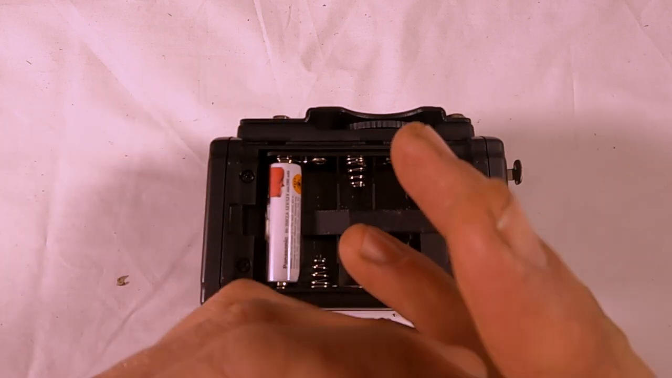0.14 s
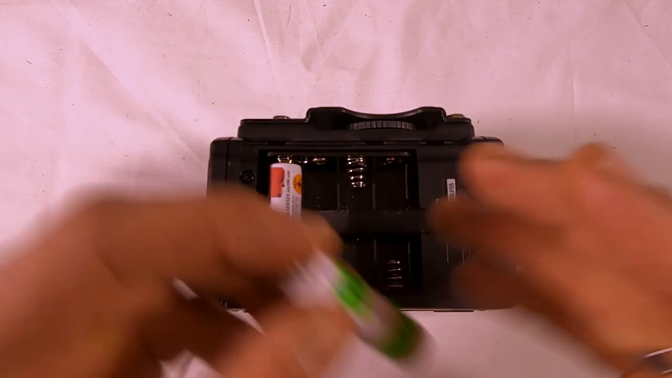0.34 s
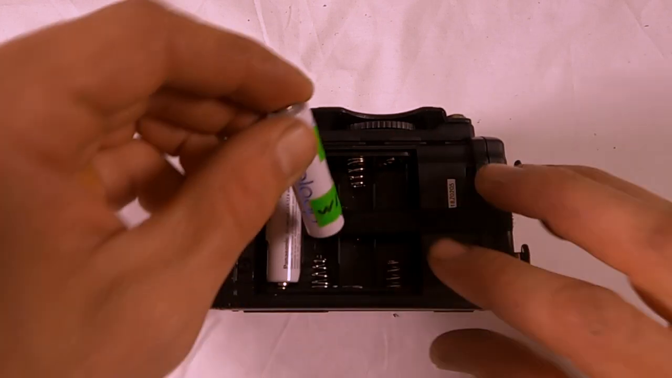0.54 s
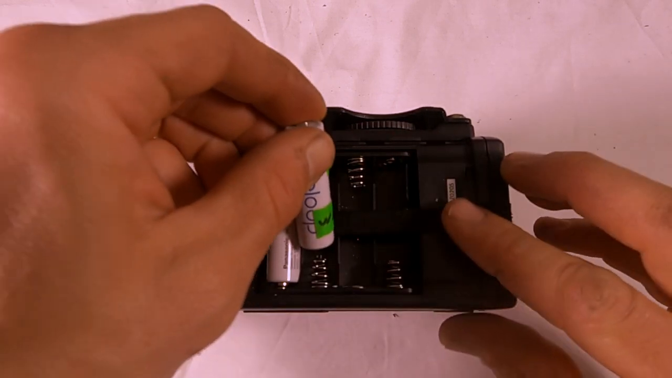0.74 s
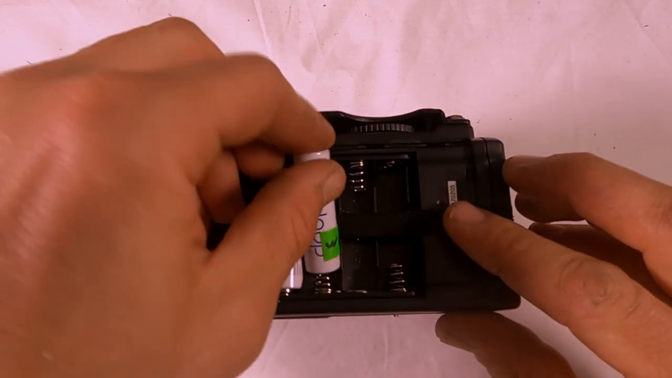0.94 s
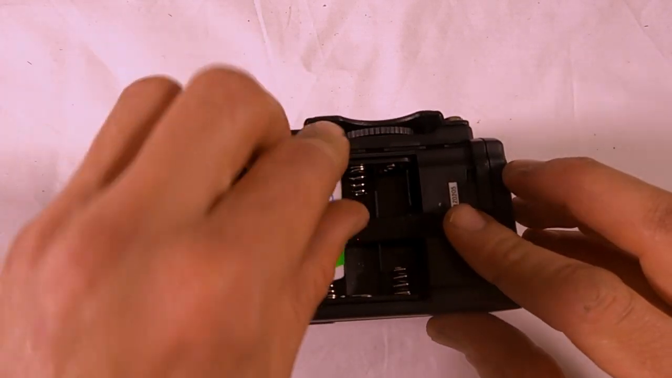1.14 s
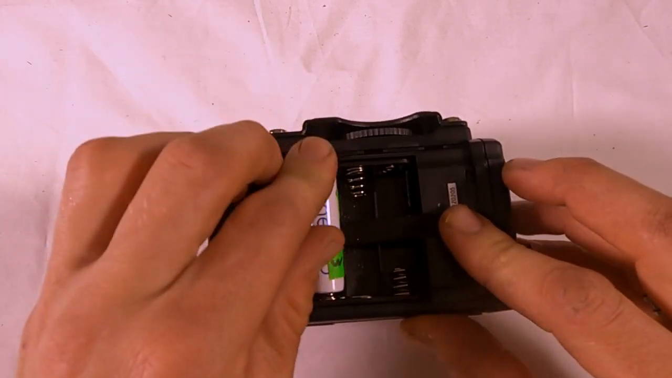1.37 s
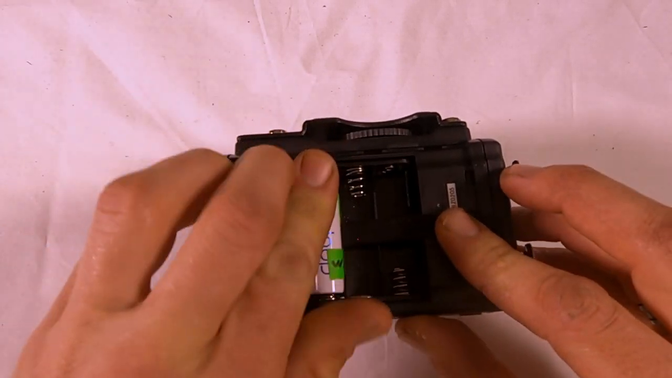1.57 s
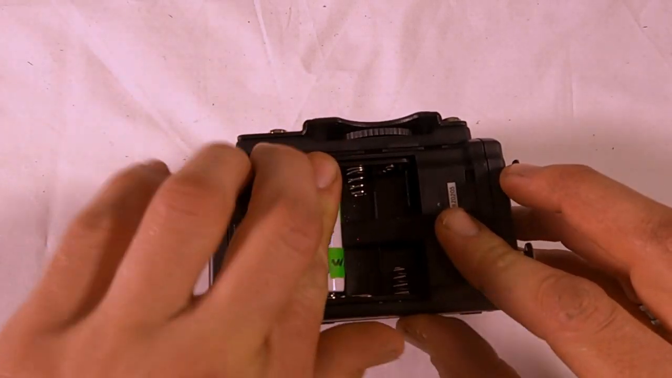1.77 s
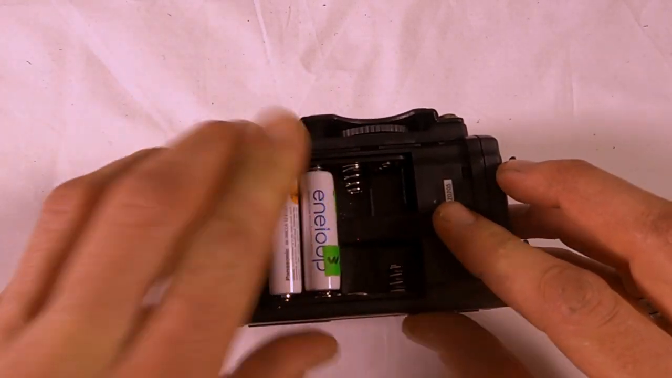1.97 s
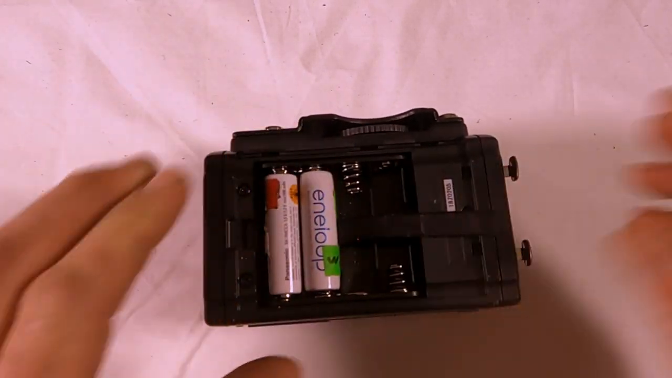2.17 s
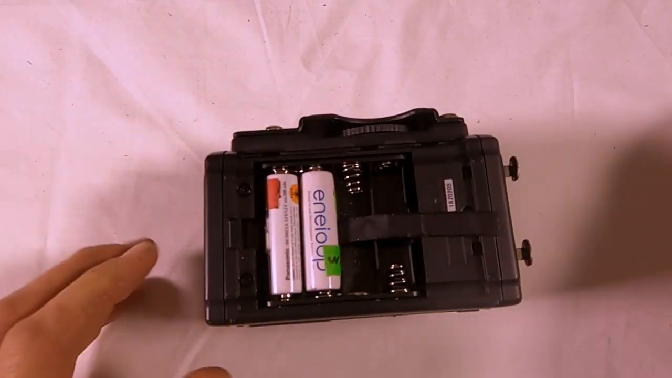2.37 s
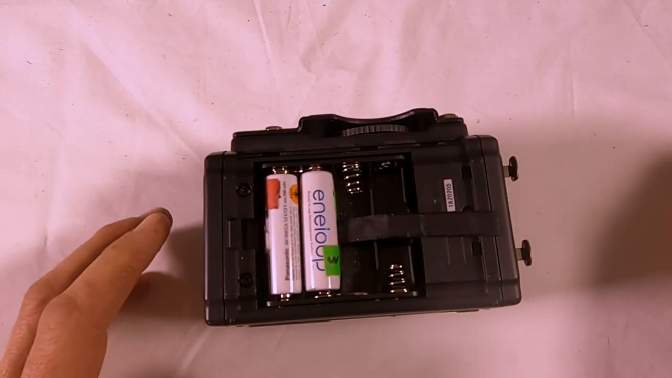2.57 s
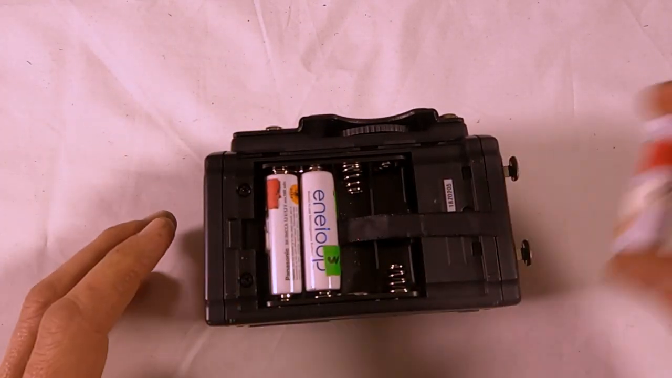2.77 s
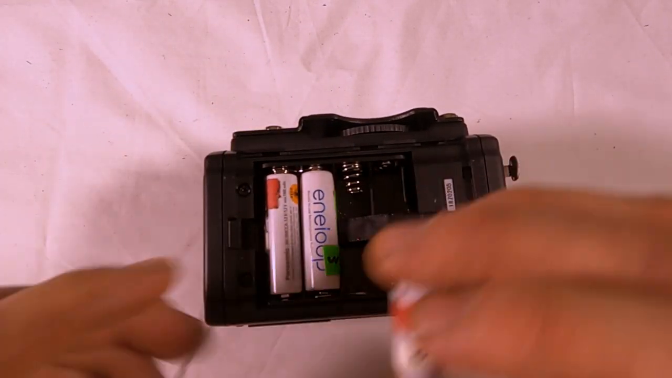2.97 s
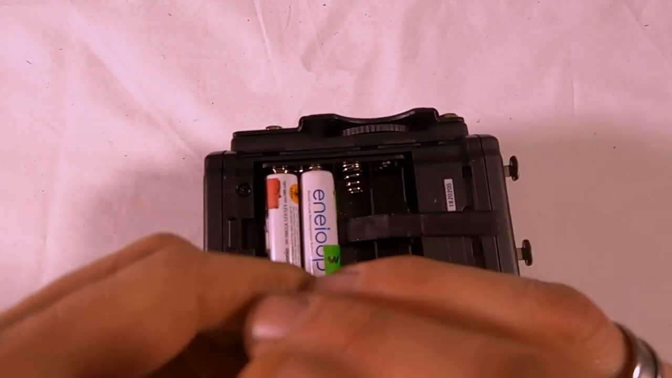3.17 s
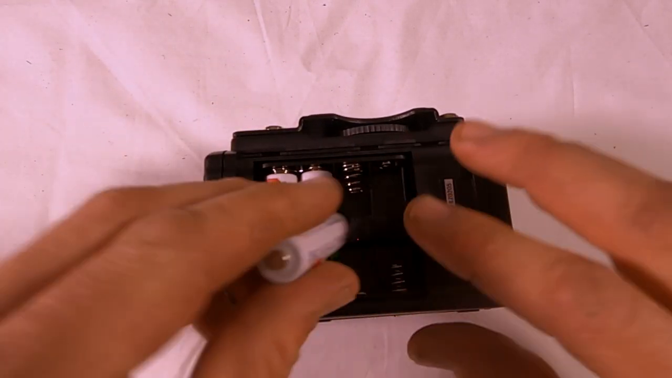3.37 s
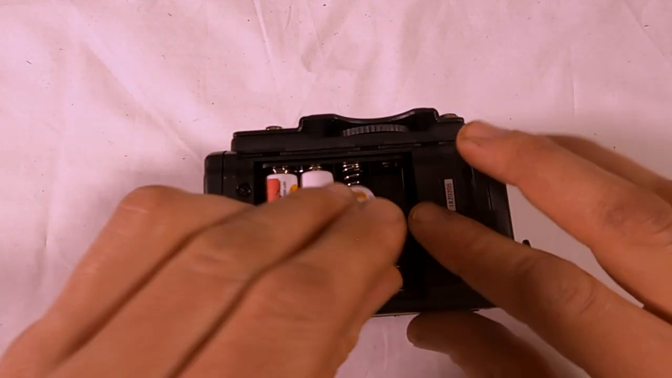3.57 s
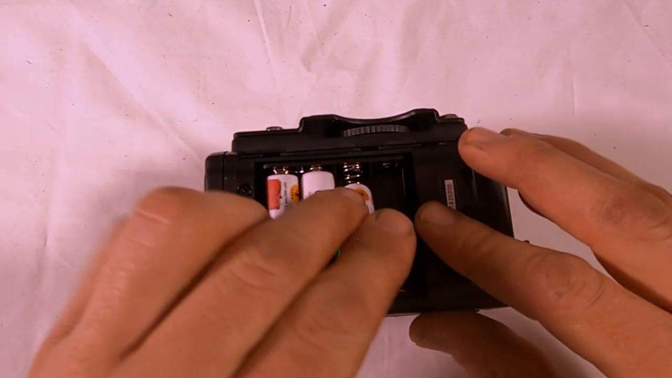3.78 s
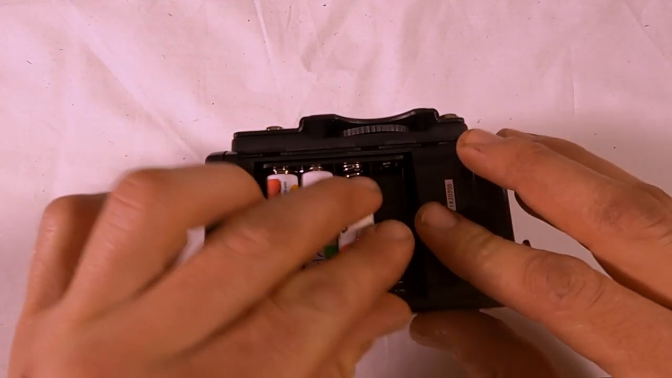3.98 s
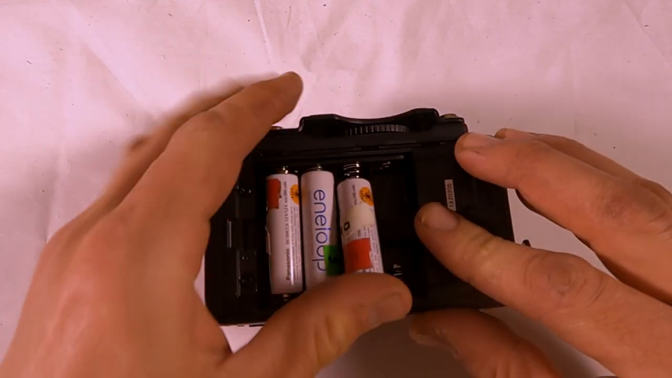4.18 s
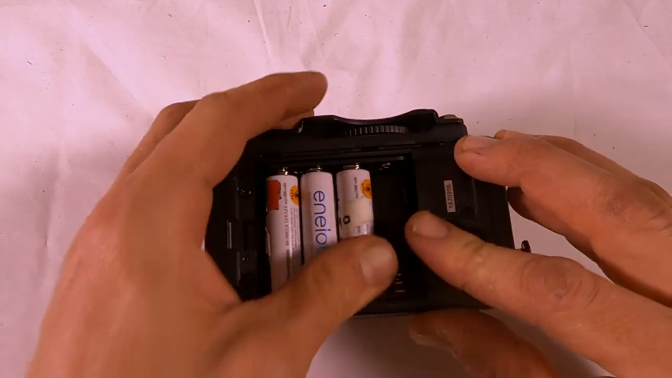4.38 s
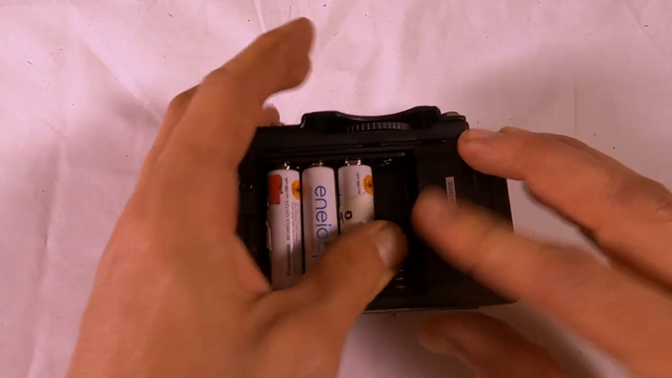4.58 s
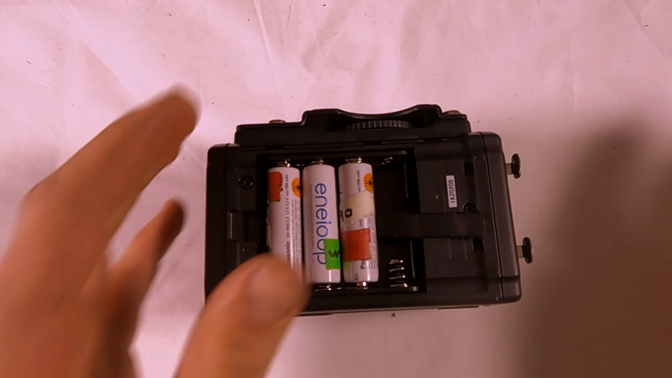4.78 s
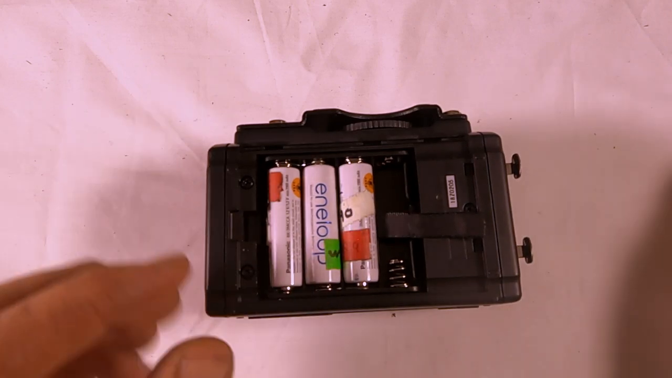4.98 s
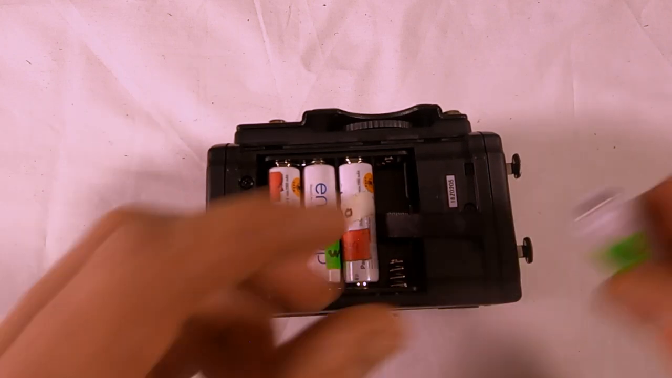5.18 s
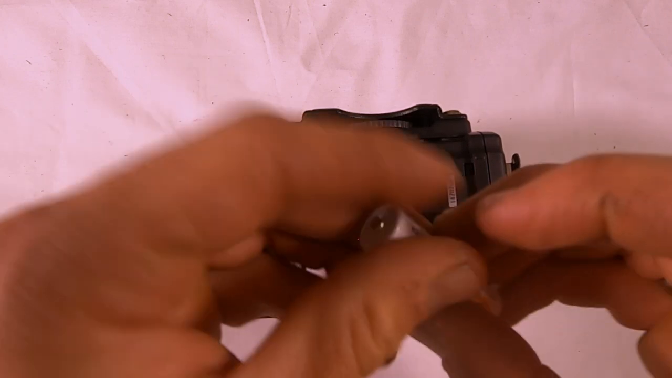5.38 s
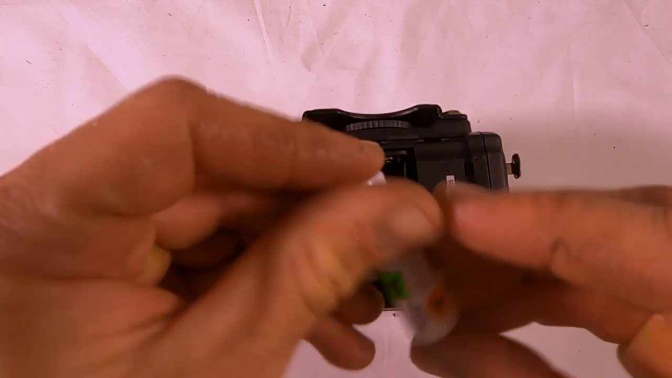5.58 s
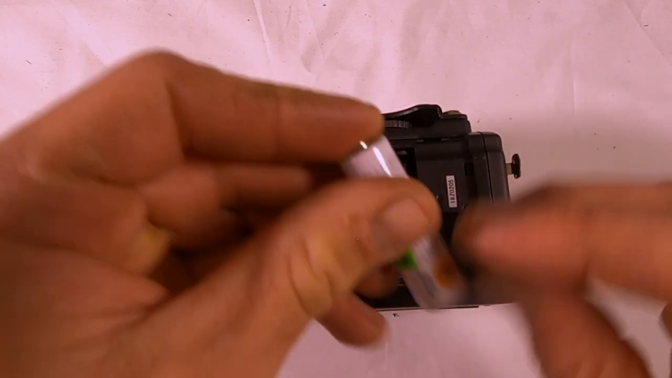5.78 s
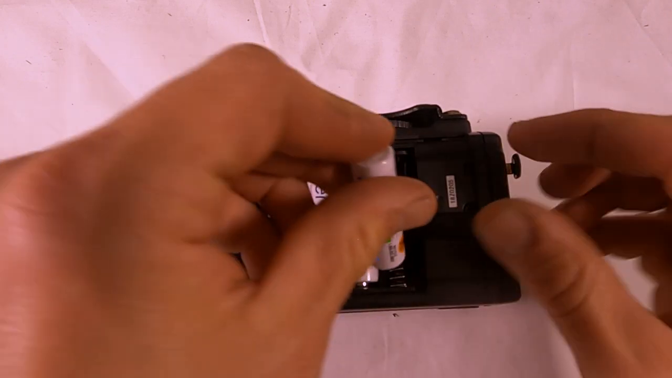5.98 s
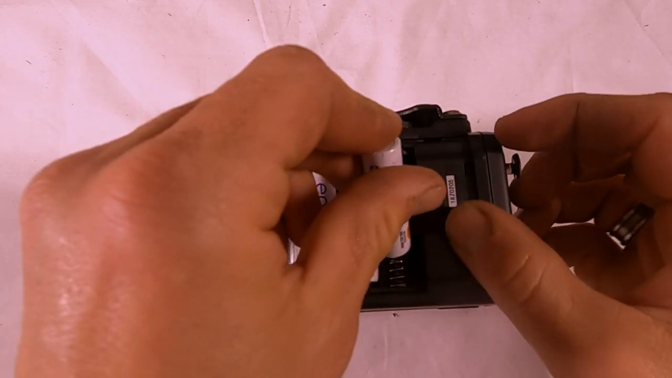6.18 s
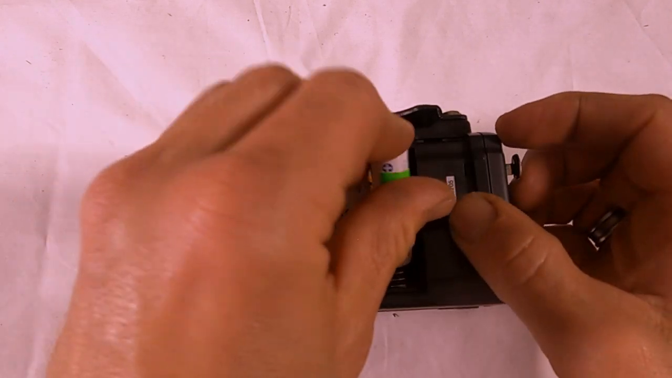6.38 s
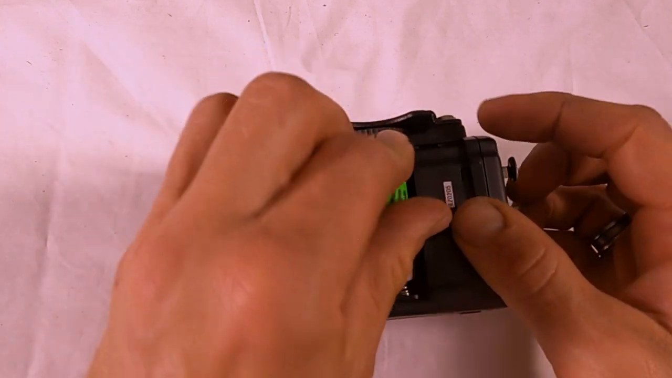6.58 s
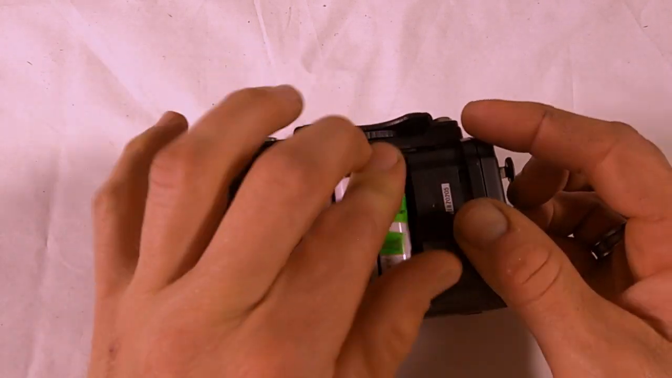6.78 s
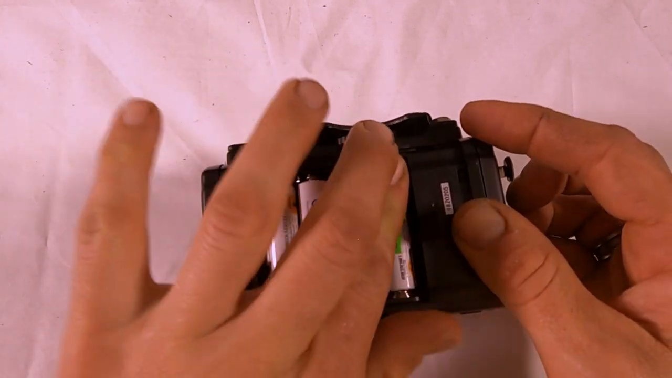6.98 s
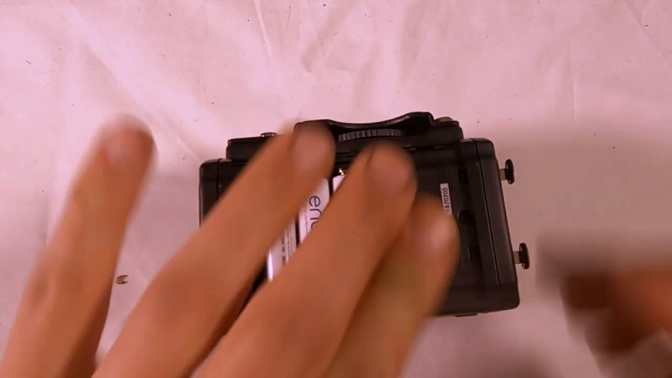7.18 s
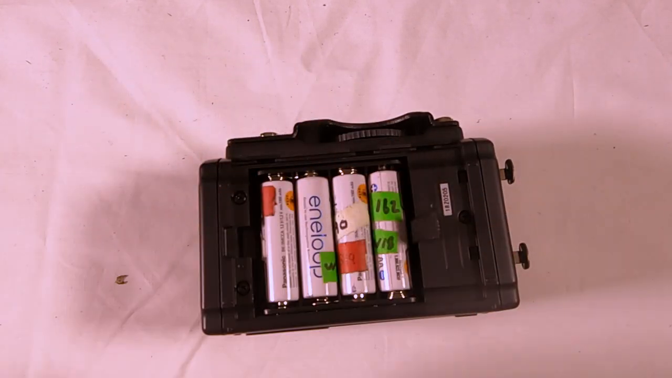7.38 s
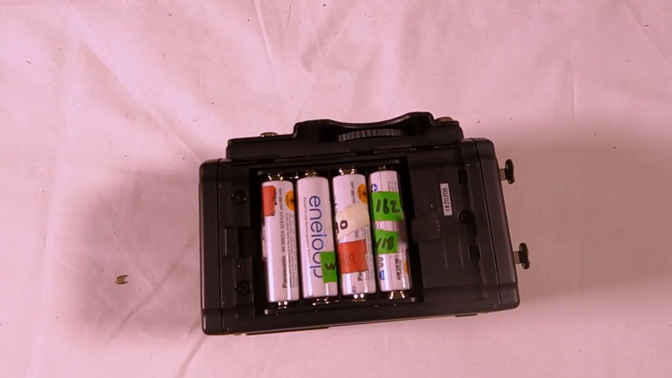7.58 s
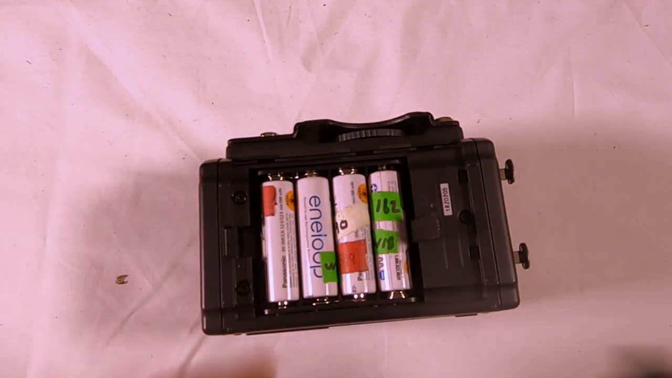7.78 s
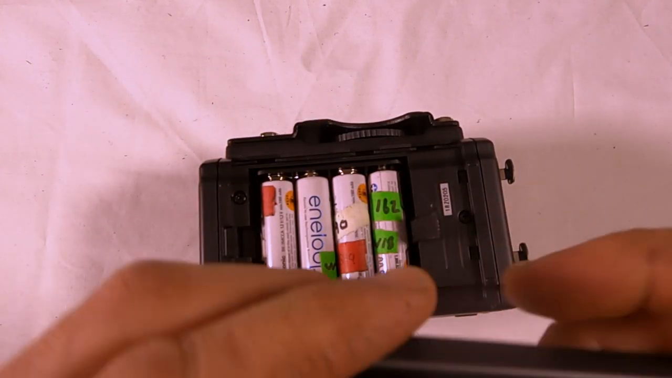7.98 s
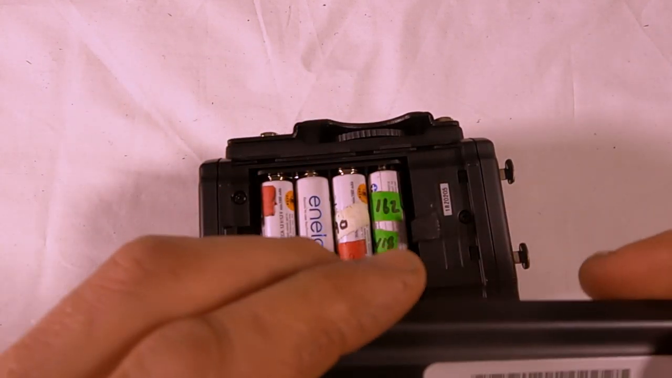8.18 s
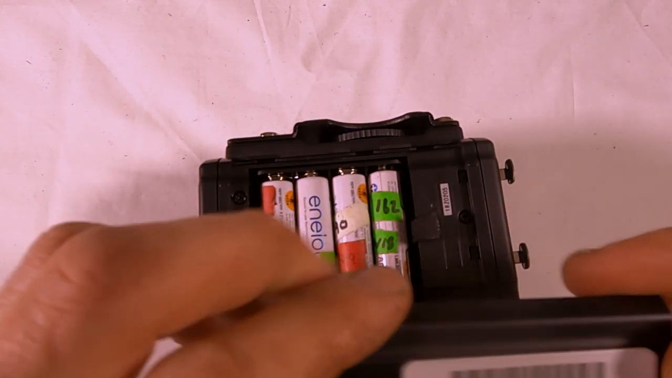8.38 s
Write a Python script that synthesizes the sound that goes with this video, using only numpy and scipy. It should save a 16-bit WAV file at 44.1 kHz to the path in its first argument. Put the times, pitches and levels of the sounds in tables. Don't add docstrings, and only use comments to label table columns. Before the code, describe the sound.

Irregular plastic clicks, springy metal ticks and one hard loud snap as batteries go into a plastic case on a table in a quiet humming room.

```python
import sys
import numpy as np
from scipy import signal
from scipy.fft import rfft, irfft, next_fast_len
from scipy.io import wavfile
from scipy.ndimage import uniform_filter1d, map_coordinates

SR = 44100
rng = np.random.default_rng(int(sys.argv[2]) if len(sys.argv) > 2 else 0)


def wrap_up_sound(samples):
    columns = np.atleast_2d(samples).T
    tamed = np.clip(columns, -1, 1)
    steps = np.round(tamed * 32767).astype(np.int16)
    wavfile.write(sys.argv[1], SR, steps)


def gain_from_db(level_db):
    decades = np.asarray(level_db, float) / 20
    return 10 ** decades


N = 372115

# freq_hz, t60_s, level_db
METAL_MODES = [(4297, 0.0012, 5.5), (4730, 0.00487, 1.5), (5200, 0.0021, 2), (6400, 0.0062, 0.5),
               (7040, 0.00301, 2.5), (8824, 0.004, 2.5), (9950, 0.0052, 1), (10080, 0.0036, 5),
               (11700, 0.0042, -0.5), (13400, 0.00059, 0.5), (14350, 0.0014, -4.5)]


def unit(x):
    return x / np.sqrt(np.mean(x ** 2))


def coloured(points):
    hz, db = np.transpose(points)
    n = next_fast_len(N, True)
    f_hz = np.maximum(np.arange(n // 2 + 1) * SR / n, 1)
    gain = gain_from_db(np.interp(np.log(f_hz), np.log(hz), db))
    return unit(irfft(rfft(rng.standard_normal(N), n) * gain, n)[:N])


def band(x, lo_hz, hi_hz):
    return signal.sosfilt(signal.butter(2, [lo_hz, min(hi_hz, .45 * SR)], "band", fs=SR, output="sos"), x)


def walk(rate_hz):
    k = int(SR / rate_hz)
    steps = np.repeat(rng.standard_normal(N // k + 1), k)
    return unit(uniform_filter1d(uniform_filter1d(steps, k), k)[:N])


def add(out, start_s, x):
    i = int(start_s * SR)
    out[i:i + len(x)] += x[:N - i]


def ring(modes, gain_db, chance, push):
    t = np.arange(int(.055 * SR))[:, None] / SR
    hz, t60_s, db = np.transpose(modes)
    n = len(hz)
    tones = np.sin(2 * np.pi * hz * (1 + .02 * chance[:n]) * t) * gain_from_db(-60 * t / t60_s)
    weight = (-1) ** np.arange(n) * gain_from_db(db + gain_db + 0.77 * chance[n:2 * n])
    y = band(signal.fftconvolve(tones @ weight, push), 0.75 * hz[0], 3.1 * hz[-1])
    return y / np.abs(y).max()


def crack(grit, hz):
    decay = np.exp(-1000 * np.arange(len(grit)) / SR)
    y = band(grit * decay, hz / 1.6, hz * 1.6)
    return y / np.abs(y).max()


def background():
    # freq_hz, level_db_per_hz
    quiet = [(12, -58.5), (20, -17), (91, -5.5), (124, -5.5), (147, -7), (251, -9.5), (281, -21),
             (305, -17), (428, -21.5), (506, -24.5), (551, -24), (794, -32.5), (11500, -48), (15200, -47),
             (16500, -64.5)]
    # freq_hz, level_db
    hum_tones = [(120.8, -56.5), (64.6, -73), (241.6, -71.5)]
    air = coloured(quiet)
    rumble = band(air, 30, 700)
    air = air - rumble + rumble * gain_from_db(0.97 * walk(2.7))
    t = np.arange(N) / SR
    hum = np.zeros(N)
    for hz, db in hum_tones:
        level = gain_from_db(db + 7.5 + 0.42 * walk(1.9))
        hum += level * np.sin(2 * np.pi * hz * t + 0.92 * walk(1.7))
    return gain_from_db(-50.5) * air + hum


def room(gap_s=0.0034):
    # freq_hz, t60_s, level_db
    room_bands = [(142, 0.14, -16.5), (320, 0.3, -24.5), (680, 0.18, -27.5), (1240, 0.27, -25),
                  (3000, 0.12, -15), (6860, 0.22, -19.5), (12500, 0.13, -15)]
    t = np.arange(int(.5 * SR)) / SR
    tail = 0
    for hz, t60_s, db in room_bands:
        part = unit(band(rng.standard_normal(len(t)), hz / 1.5, hz * 1.5)) * gain_from_db(-60 * t / t60_s)
        tail = tail + gain_from_db(db) * part * np.sqrt(14 / t60_s / SR)
    return tail * np.clip((t - gap_s) / 0.0026, 0, 1)


def thumps():
    # start_s, peak_db, pitch_hz, knock_re_peak_db, t60_ms
    table_thumps = [(0.609, -43, 115, -8, 110), (1, -40, 69.6, -20, 110), (1.259, -39, 110, -18, 110),
                    (1.316, -25, 60, -12, 65), (1.396, -40.5, 114, -22, 110), (1.471, -37, 74, -33, 100),
                    (1.529, -42, 118, -14, 120), (1.802, -39, 57, -12, 100), (2.34, -21, 103, -21, 65),
                    (2.376, -38.5, 91, -9, 90), (2.399, -34, 148, -14.5, 80), (2.571, -50, 153, -23, 150),
                    (3.9345, -24, 118, -20, 45), (4.197, -29.5, 78, -2.5, 80), (4.3, -22, 80, -16.5, 65),
                    (4.343, -28, 111, -12.5, 80), (4.379, -39, 127, -12, 140),
                    (4.917, -23, 123.4, -26, 120), (4.977, -42, 125, -12, 130), (6.467, -37, 93, -12, 100),
                    (6.506, -35, 211, -9, 90), (6.765, -18, 83, -7, 45), (6.782, -28, 90, -8, 70),
                    (7.059, -47, 100, 6.5, 140), (7.141, -42.5, 99, -4.5, 120),
                    (7.397, -34.5, 113.6, -29, 80), (7.433, -34, 123, -12, 70),
                    (7.848, -40.5, 56.5, -9, 110)]
    # start_s, peak_db
    sways = [(1.316, -42), (1.396, -49), (1.805, -38), (2.339, -35), (2.375, -32), (2.399, -36),
             (3.933, -41), (4.297, -53), (4.345, -50), (4.917, -43), (4.976, -41.5), (6.466, -50),
             (6.505, -34.5), (6.762, -50.5), (7.142, -46), (7.433, -45), (7.849, -42.5)]
    overtone_ms = 36
    out, t = np.zeros(N), np.arange(int(.3 * SR)) / SR
    rise = 1 - np.exp(-t / 0.0035)
    case = np.sin(2 * np.pi * 350 * t) + 0.52 * np.sin(2 * np.pi * 255 * t) + 0.38 * np.sin(2 * np.pi * 530 * t)
    case = case * gain_from_db(-60 * t / 0.071)
    for s, db, hz, knock_db, ms in table_thumps:
        overtone = np.sin(2 * np.pi * 1.805 * hz * t) * gain_from_db(-60 * t / 0.14)
        undertone = np.sin(2 * np.pi * 0.72 * hz * t)
        tone = np.sin(2 * np.pi * hz * t) + (overtone_ms / ms) ** 1.5 * overtone + 0.15 * undertone
        table = tone * gain_from_db(-60 * t / (ms / 1000))
        add(out, s - .001, gain_from_db(db + 3.5) * rise * (table + gain_from_db(knock_db + 5.0) * case))
    for s, db in sways:
        add(out, s - .001, gain_from_db(db + 3.5) * np.sin(2 * np.pi * 33 * t) * gain_from_db(-60 * t / .15))
    return out


def rubs():
    # freq_hz, level_db_per_hz
    skin_spectrum = [(1290, -25), (2200, -6), (2600, 0), (3120, -8), (4610, -11), (4760, -6), (5480, -3),
                     (6530, -12.5), (8370, -3), (14100, -6.5), (16000, -16.5)]
    # loudest_s, bright_db, swell_s, fade_s, dull_re_bright_db
    strokes = [(.43, -74.5, 0.21, 0.32, 10.5), (.898, -64, 0.027, 0.01, 3), (1.474, -64.5, .05, 0.032, 4),
               (1.543, -60, 0.036, 0.029, 8.5), (1.704, -71.5, 0.022, 0.034, 7),
               (1.745, -64, 0.0075, 0.062, 12), (2.25, -70, .14, 0.23, -13), (2.375, -83, 0.27, 0.16, 27),
               (2.47, -69.5, .03, 0.34, 6), (3.855, -59, 0.029, 0.077, 8), (4.076, -68.5, 0.12, .13, 15),
               (4.296, -57, 0.024, 0.043, 7), (4.348, -61, 0.03, 0.011, 8), (4.36, -69.5, 0.025, .15, 11),
               (4.624, -71, 0.12, 0.19, 9), (4.956, -60.5, 0.063, 0.1, 7.5), (6.638, -67, 0.02, .02, 4),
               (6.698, -66, 0.079, 0.014, 6), (7.045, -70.5, 0.019, 0.19, 10), (7.118, -73, 0.052, .2, 9),
               (7.922, -70, 0.17, 0.072, 6), (7.995, -76, 0.093, .06, 9.5), (8.06, -69, 0.014, 0.084, -9),
               (8.15, -75, 0.078, .018, -1)]
    # time_s, bright_db, dull_re_bright_db
    sweep = [
        (7.36, -72, -18),
        (7.418, -71, 0),
        (7.456, -62, -1),
        (7.49, -75.5, 6),
        (7.572, -50, -3.5),
        (7.606, -49, -1),
        (7.62, -69, 0),
        (7.754, -71, 7),
        (7.833, -61.5, 2),
    ]
    stroke_drop_db = 23.5
    t = np.arange(N) / SR
    grain = gain_from_db(2.2 * walk(150) + 0.6 * walk(45))
    hiss = coloured(skin_spectrum)
    lower = band(hiss, 1000, 6500)
    bright = unit(lower * grain[::-1] + (hiss - lower) * np.sqrt(grain))
    dull = unit(band(band(rng.standard_normal(N), 400, 1900), 230, 2100) * grain)
    s, db, dull_db = np.transpose(sweep)
    edge = np.clip(np.minimum(t - s[0], s[-1] - t) / 0.003, 0, 1)
    skin = edge * gain_from_db(np.interp(t, s, db))
    cloth = skin * gain_from_db(np.interp(t, s, dull_db))
    for s, db, swell_s, fade_s, dull_db in strokes:
        start_s = s - 2 * swell_s
        u = np.arange(int(2 * (swell_s + fade_s) * SR)) / SR - 2 * swell_s
        shape = gain_from_db(db - stroke_drop_db * np.maximum(-u / swell_s, u / fade_s))
        add(skin, start_s, shape)
        add(cloth, start_s, gain_from_db(dull_db) * shape)
    return skin * bright + cloth * dull


def creaks():
    # start_s, level_db, pitch_hz, length_ms, roughness_0_to_1
    spring_creaks = [(.656, -59, 900, 50, .4), (.885, -58, 1350, 22, .1), (.90, -57, 730, 25, .2),
                     (2.875, -54, 475, 70, .15), (3.748, -53, 740, 22, .1), (3.853, -41, 745, 70, .08),
                     (4.08, -59, 1130, 40, .4), (5.12, -69, 1700, 240, .9), (5.1, -66, 800, 240, 1),
                     (7.66, -67, 1700, 240, .9), (7.47, -62, 2300, 90, .9), (6.128, -55, 780, 18, .4),
                     (6.254, -62, 1520, 100, .9), (6.449, -47, 780, 18, .2)]
    sharp, settle_s = .1, .012
    out, t = np.zeros(N), np.arange(int(.25 * SR)) / SR
    glide_t = t - sharp * settle_s * np.exp(-t / settle_s)
    for s, db, hz, ms, rough in spring_creaks:
        length_s, spread = ms / 1000, 1.04 + .07 * rough
        scrape = unit(band(rng.standard_normal(len(t)), hz / spread, hz * spread))
        release = np.clip((length_s - t) / .012 + .5, 0, 1)
        shape = np.minimum(t / .004, 1) * gain_from_db(-8 * t / length_s) * release
        note = np.sin(2 * np.pi * hz * glide_t)
        add(out, s, gain_from_db(db) * shape * (np.sqrt(2 - 2 * rough) * note + np.sqrt(rough) * scrape))
    return out


def pings():
    # start_s, peak_db, pitch_hz, t60_ms
    part_pings = [(1.3153, -20, 11700, 5), (1.3159, -25, 8520, 7.6), (1.315, -33, 14500, 4),
                  (1.316, -30, 6000, 5), (1.323, -42, 2660, 50), (1.396, -44, 2670, 22),
                  (1.397, -52, 11500, 5), (1.47, -51, 2700, 30), (1.8045, -28.5, 4630, 17),
                  (1.8044, -28, 8700, 5.6), (1.804, -27, 10700, 7), (1.8045, -33, 13500, 5),
                  (1.8045, -38, 15400, 4), (3.933, -22, 9000, 4), (3.9325, -32, 13500, 5),
                  (4.2008, -44, 9000, 5), (4.2003, -43, 4800, 6), (4.242, -60, 6500, 8.4),
                  (4.242, -62, 8800, 5), (4.284, -54, 5530, 6), (4.293, -56, 11000, 5),
                  (4.292, -52, 2600, 8), (4.297, -52, 8950, 6), (4.302, -46, 5770, 6),
                  (4.302, -59, 12500, 5), (4.347, -35, 5700, 9.2), (4.346, -39, 8530, 5.2),
                  (4.347, -50, 10700, 6), (4.348, -36.5, 2710, 11), (4.347, -48, 14500, 4),
                  (4.361, -57, 5800, 8), (4.361, -57, 8600, 8), (4.371, -50, 2750, 8),
                  (4.39, -45.5, 5630, 7), (6.467, -50, 9000, 6), (6.489, -54, 4000, 25),
                  (6.497, -56, 9000, 6), (6.507, -32.5, 8900, 6), (6.507, -41, 10900, 7),
                  (6.5065, -41, 7000, 4.5), (6.5065, -50, 14000, 4), (6.637, -46, 3300, 15),
                  (6.7743, -35, 6500, 7), (6.7745, -32, 9000, 7), (7.602, -57, 12000, 4),
                  (7.602, -50, 14300, 4), (7.645, -51, 2600, 13), (7.8485, -33.5, 8450, 4.5),
                  (7.8485, -38, 4980, 7.7), (7.893, -62, 9000, 3),
                  (.883, -56, 2800, 20), (.895, -50, 2650, 14), (.977, -52, 1750, 12),
                   (1.006, -52, 2600, 35), (3.9325, -26, 5200, 6), (6.763, -44, 14000, 5),
                   (6.7745, -48, 14000, 8), (7.596, -52, 5500, 14), (7.125, -58, 9000, 6),
                   (7.849, -36, 14500, 4), (7.849, -34, 11500, 5), (7.642, -58, 8800, 14),
                   (2.449, -56, 9000, 4)]
    rise_ms = .5
    out, t = np.zeros(N), np.arange(int(.06 * SR)) / SR
    rise = 1 - np.exp(-(1000 * t / rise_ms) ** 2)
    for s, db, hz, ms in part_pings:
        shape = rise * gain_from_db(-60 * 1000 * t / max(ms, 1))
        add(out, s - rise_ms / 1000, gain_from_db(db) * np.sin(2 * np.pi * hz * t) * shape / shape.max())
    return out


def clicks():
    # freq_hz, t60_s, level_db
    shell_modes = [(424, 0.057, 1.5), (560, 0.0051, -8), (748.7, 0.019, 10), (916, 0.045, -1),
                   (925, 0.013, 5.5), (1233, 0.018, 0), (1385, 0.0098, 4), (1515, 0.037, -6.5),
                   (1578, 0.0088, 8), (1780, 0.00844, -3)]
    # freq_hz, t60_s, level_db
    wall_modes = [(2280, 0.0079, 3), (2570, 0.0058, 2), (2658, .014, -9), (2734, 0.00484, 3.5),
                  (3397, 0.0077, 1.5), (3804, 0.0018, 3.5)]
    # start_s, shell_peak_db, wall_re_shell_db, metal_re_shell_db
    taps = [(0.882, -49, -11, -19), (0.895, -51, -10, -20), (0.976, -44, -28, -31), (0.9994, -31, -12, -32),
            (1.322, -29.5, -13, -25), (1.331, -34.5, -30, -46), (1.396, -36, -12, -28),
            (3.719, -50.5, -18, -26), (3.743, -49.5, -29, -19), (3.959, -63, -14, -26),
            (4.071, -57, 2, -17), (4.301, -42, -6, -19), (4.346, -30, -8, -22.5), (4.371, -44, -6, -23),
            (4.619, -54.5, -11, -15.5), (6.13, -55, -23.5, -21.5), (6.466, -27.5, -16, -34),
            (6.489, -48.5, -1, -17), (6.509, -31, -22.5, -25), (6.634, -55, 12, -11),
            (6.763, -19.5, -12, -27), (7.083, -50.5, -14, -22), (7.12, -49, -7, -20), (7.18, -57.5, 0, -13)]
    # start_s, shell_peak_db, wall_re_shell_db, metal_re_shell_db
    knocks = [(0.377, -57, -4, -35), (1.315, -30, -1, -5), (1.469, -42.5, -10, -30), (1.744, -58, 8, -23),
              (1.89, -58, -19, -30), (1.928, -61, -1, -19), (2.337, -44.5, -12, -32),
              (2.373, -44.5, -28, -35), (2.449, -59.5, 11.5, -0.5), (4.284, -55, -4, -19),
              (4.359, -47, -25, -26), (4.39, -43.5, -6, -25), (4.514, -63.5, -13.5, 0),
              (4.916, -40.5, -37, -38), (4.942, -47, -9, -24), (5.495, -69, -15, -6.5),
              (6.159, -59, -17, -19), (6.664, -53, -19, -24), (6.689, -66, -2, -6),
              (6.774, -25.5, -5, -16.5), (6.85, -45.5, -31.5, -31), (6.918, -54.5, -7, -19.5),
              (7.067, -53, -1, -30), (7.43, -55.5, -1, -30), (7.606, -64, -3, -15), (7.64, -54.5, 4.5, -10)]
    tap_hz, knock_hz = 680, 415
    chatter_ms, chatter_ms_per_db = 0.84, 0.18
    out, t = np.zeros(N), np.arange(1024) / SR
    contacts = sorted([(*row, tap_hz) for row in taps] + [(*row, knock_hz) for row in knocks])
    chance = rng.standard_normal((len(contacts), 3, 40))
    grit = rng.standard_normal((len(contacts), 1024))
    for (s, db, wall_db, metal_db, hz), c, g in zip(contacts, chance, grit):
        span_s = max(chatter_ms - chatter_ms_per_db * metal_db, .2) / 1000
        chatter = g * np.exp(-t / span_s) * np.minimum(t / (0.54 * span_s), 1)
        blow = (t == 0) + 0.11 * chatter
        octaves = np.log2(np.array(shell_modes)[:, 0] / hz)
        near_db = np.where(octaves < 0, 24.0 * octaves, -6.0 * octaves)
        shell = band(ring(shell_modes, near_db, c[0], (t == 0) + 0.25 * chatter), 0.36 * hz, 4600)
        wall = gain_from_db(wall_db - 2.0) * ring(wall_modes, 0, c[1], blow)
        metal = gain_from_db(metal_db + 13.5) * ring(METAL_MODES, 0, c[2], blow)
        add(out, s + .0003, gain_from_db(db + 5.0) * (shell + wall + metal))
        add(out, s + 0.00035, gain_from_db(db + metal_db + 7) * crack(g[::-1], 5840))
    return out


def snaps():
    # start_s, peak_db, metal_re_peak_db, seat_index (rounded), chatter_ms
    cell_snaps = [
        (1.8042, -22.5, -10.5, 0.5, 3.9),
        (3.932, -1.5, -26, 1, 1.4),
        (3.9435, -16.5, -28, 4, 1.5),
        (4.2005, -14.5, -31, 2.5, 4.2),
        (7.848, -19.5, -5, 3, 1.83),
    ]
    # freq_hz, level_db, t60_s
    seat_a = [(680, -5, 0.013), (920, -7, 0.017), (1355, -4, 0.01), (2010, -9, 0.0039),
              (2320, -7.5, 0.0091), (3180, -6, 0.012), (3870, -1.5, 0.0035), (4820, 1, 0.0053)]
    seat_b = [(768, 1, 0.028), (987, 4.5, 0.019), (1160, 0.5, 0.017), (1365, -1.5, 0.023),
              (1548, -3.5, .02), (1780, 0, 0.019), (2170, -6, 0.011), (2332, -1.5, 0.016),
              (2864, -6.5, .012), (3220, -12.5, 0.015), (3540, -17.5, 0.0046)]
    seat_c = [(407, -1, 0.046), (726, -4.5, 0.082), (860, -3.5, 0.051), (963, -1.5, 0.011),
              (1296, 0, 0.014), (1664, -11.5, 0.022), (2230, -17.5, 0.029), (2610, -17.5, 0.051),
              (3160, -12, 0.0055)]
    seat_d = [(700, 5.5, 0.0097), (956, -3, 0.015), (1326, -4, 0.044), (1730, -4, 0.014),
              (2470, -0.5, 0.048), (3040, -4, 0.0089), (3580, -4, 0.0087), (4200, -1, 0.0099)]
    seat_e = [(400, -9.5, 0.023), (802, 1, .025), (1000, -6.5, .015), (1350, -3.5, .018),
              (1840, -4.5, 0.017), (2300, -11, .01), (2790, -15, .012)]
    # centre_hz, level_re_peak_db
    cracks = [
        (10700, 2.5),
        (3970, -13.5),
        (3204, -21),
        (4000, -3.5),
        (3000, -19.5),
    ]
    seats = [seat_a, seat_b, seat_c, seat_d, seat_e]
    out, t = np.zeros(N), np.arange(512) / SR
    chance = rng.standard_normal((len(cell_snaps), 2, 40))
    grit = rng.standard_normal((len(cell_snaps), 512))
    for (s, db, metal_db, seat, ms), c, g in zip(cell_snaps, chance, grit):
        index = int(round(seat))
        hz, mode_db, t60_s = np.transpose(seats[index])
        chatter = g * np.exp(-1000 * t / max(ms, .2))
        body = ring(np.transpose([hz, t60_s, mode_db]), 0, 0.25 * c[0], (t == 0) + 0.04 * chatter)
        tick = ring(METAL_MODES, 0, c[1], (t == 0) + 0.21 * chatter)
        add(out, s, gain_from_db(db) * (band(body, .75 * hz[0], 12000) + gain_from_db(metal_db + 1.0) * tick))
        crack_hz, crack_db = cracks[index]
        add(out, s, gain_from_db(db + crack_db) * crack(g[::-1], crack_hz))
    return out


def scene():
    near = thumps() + rubs() + creaks() + pings() + clicks() + snaps()
    scatter_samples, scatter_hz = 3, 1100
    heard_at = np.arange(N) + scatter_samples * walk(scatter_hz)
    aside = map_coordinates(near, [heard_at], mode="nearest")
    echo = signal.fftconvolve(aside, room())[:N]
    return (near + echo + background())[None]


def band_limit(x):
    return signal.sosfilt(signal.butter(12, 16790, fs=SR, output="sos"), x)


def record(dry):
    mix = signal.sosfilt(signal.ellip(8, .2, 70, 16300, fs=SR, output="sos"), dry)
    return band_limit(mix)


dry = scene()
out = record(dry)
wrap_up_sound(out)
```